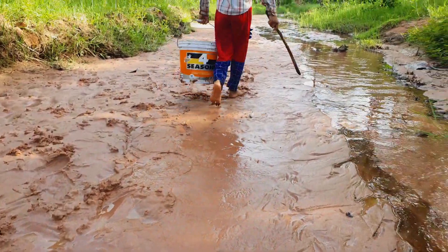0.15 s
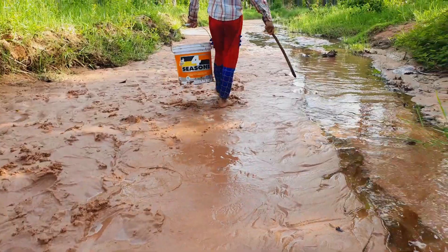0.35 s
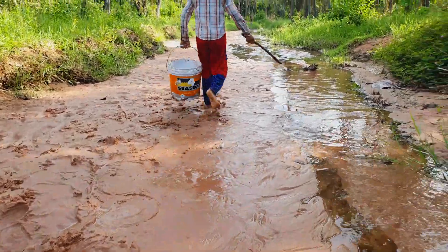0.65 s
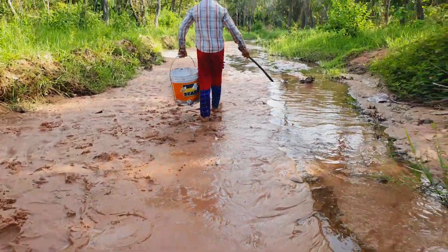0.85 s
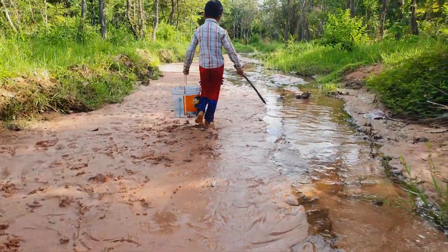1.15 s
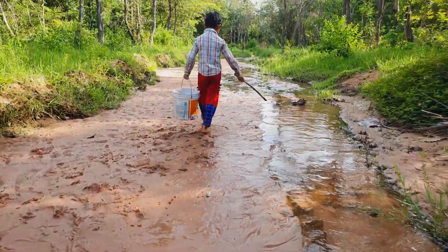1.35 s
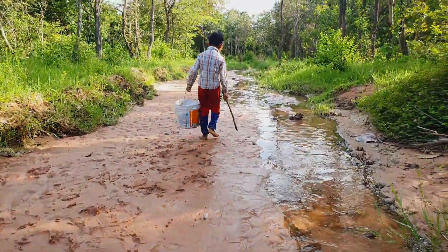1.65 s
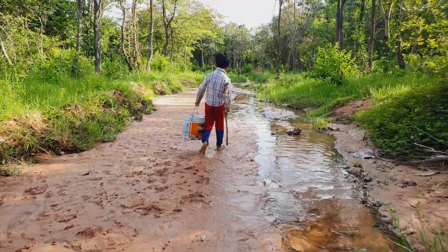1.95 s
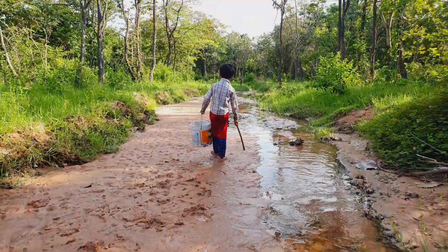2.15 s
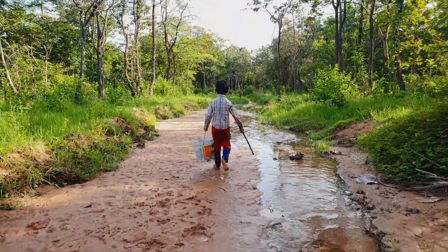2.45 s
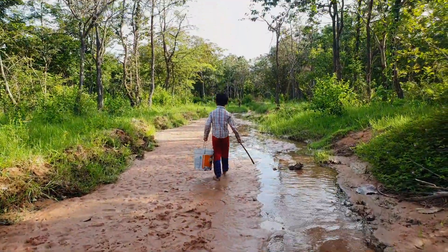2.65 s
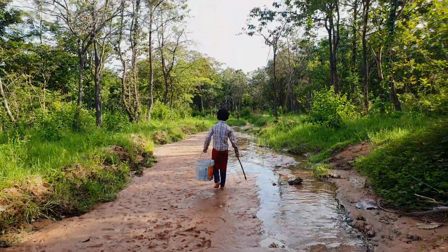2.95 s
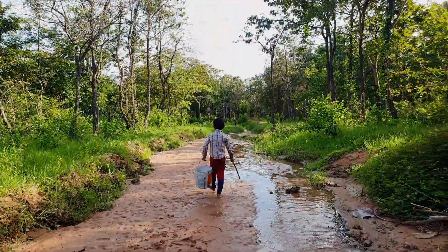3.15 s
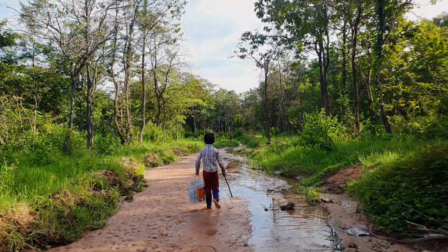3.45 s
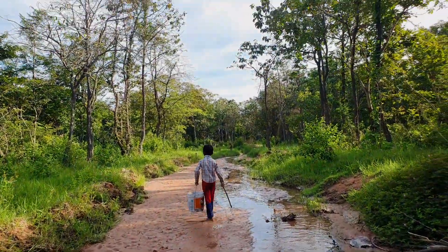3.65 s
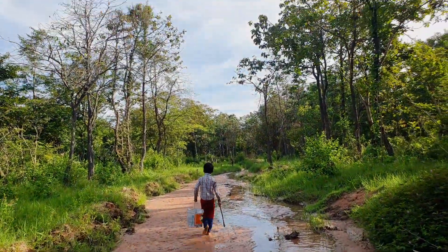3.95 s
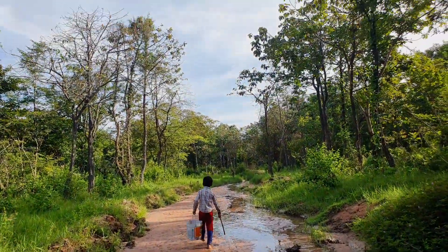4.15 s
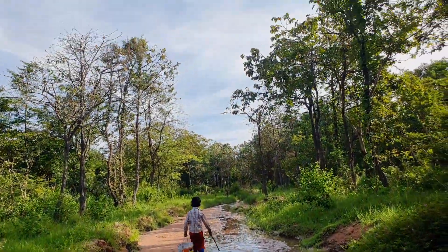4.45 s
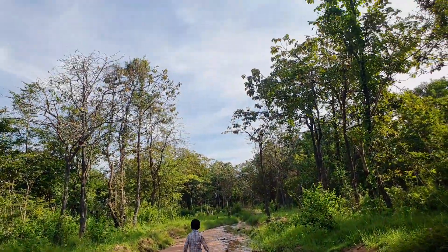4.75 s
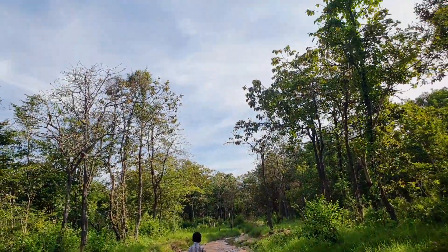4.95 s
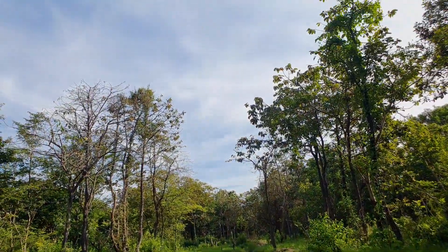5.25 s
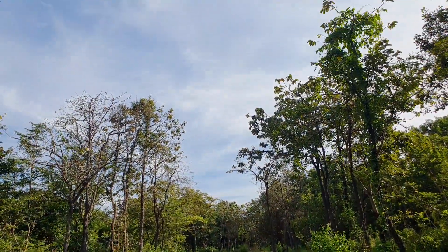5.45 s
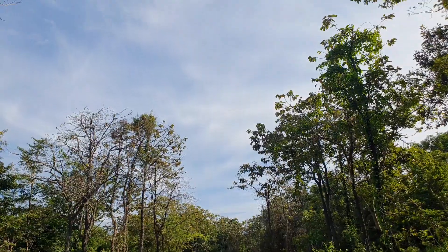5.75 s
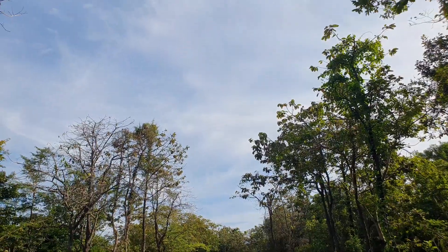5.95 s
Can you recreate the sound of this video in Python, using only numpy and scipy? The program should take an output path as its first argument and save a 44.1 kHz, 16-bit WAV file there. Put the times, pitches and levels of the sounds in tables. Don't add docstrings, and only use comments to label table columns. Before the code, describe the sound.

A high, continuous insect drone and a deep distant rumble fill a leafy outdoor space. Birds call above it: thin upward whistles, falling notes, evenly repeated flicks, then a rapid chatter at the close. Someone walks away over wet sand, the first scuff clearest, later ones faint, with dry ticks and a bucket knock just after four seconds. Soft pulsing katydid buzzes rise and fade midway. Handheld microphone, wide natural stereo.

```python
import sys
import numpy as np
from scipy import signal
from scipy.fft import rfft, irfft, next_fast_len
from scipy.io import wavfile
from scipy.ndimage import uniform_filter1d

SR = 44100
rng = np.random.default_rng(int(sys.argv[2]) if len(sys.argv) > 2 else 0)


def to_wav(sig):
    pcm = np.clip(np.atleast_2d(sig), -1, 1) * 32767
    pcm = np.round(pcm).astype(np.int16)
    wavfile.write(sys.argv[1], SR, pcm.T)


def ratio(d):
    e = np.asarray(d, float) / 20
    return 10 ** e


N = 268467


def colour(x, points):
    hz, db = np.transpose(points)
    size = next_fast_len(N)
    f = np.maximum(np.arange(size // 2 + 1) * SR / size, 1)
    gain = ratio(np.interp(np.log(f), np.log(hz), db))
    return irfft(rfft(x, size) * gain, size)[..., :N]


def unit(x):
    return x / np.sqrt(np.mean(x ** 2))


def curve(table):
    s, *columns = np.transpose(table)
    return [np.interp(np.arange(N) / SR, s, c) for c in columns]


def walk(rate):
    k = int(SR / rate)
    steps = np.repeat(rng.standard_normal(N // k + 1), k)
    return unit(uniform_filter1d(uniform_filter1d(steps, k), k)[:N])


def wavering(hz, wander_hz, rate):
    return np.sin(2 * np.pi * np.cumsum(hz + wander_hz * walk(rate)) / SR)


def band(x, lo_hz, hi_hz, order=2):
    return signal.sosfilt(signal.butter(order, [lo_hz, min(hi_hz, .45 * SR)], "band", fs=SR, output="sos"), x)


def add(out, s, x):
    i = max(int(s * SR), 0)
    out[..., i:i + x.shape[-1]] += x[..., :N - i]


def progress(length):
    return np.arange(int(length * SR)) / (length * SR)


def noise_tail(shape, t60, t):
    tail = rng.standard_normal((*shape, len(t))) * ratio(-60 * t / t60)
    return tail


# (time [s], length [s], from [Hz], to [Hz], level [dB])
RISING_WHISTLES = [
    (0.718, .085, 4190, 5320, -49.5),
    (2.243, 0.058, 3770, 4260, -44.5),
    (2.281, 0.12, 4070, 5410, -40.5),
    (2.866, .12, 3854, 5450, -48.5),
    (4.436, .185, 3620, 5710, -42),
    (5.39, 0.083, 4070, 5270, -50),
    (5.916, .115, 3810, 5060, -49),
]
UPWARD_FLICKS = [
    -54.5,
    -52,
    -55,
    -55,
    -55.5,
    -53.5,
]
FIRST_FLICK_S, FLICK_EVERY_S, FLICK_S = 2.788, .293, 0.036
# (time [s], from [Hz], level [dB])
FALLING_WHISTLES = [
    (.825, 3220, -53),
    (1.745, 3220, -55.5),
    (2.586, 3270, -53.5),
    (3.59, 3310, -51.5),
]
FALL_HZ_PER_S, FALL_END_HZ = 11500, 2300
# (time [s], length [s], from [Hz], to [Hz], level
# [dB])
LEAD_IN_NOTES = [(0.707, 0.03, 4260, 3700, -53), (0.719, 0.034, 3690, 3550, -54),
                 (1.628, 0.15, 3720, 3510, -64), (2.457, 0.023, 4350, 3660, -53),
                 (2.463, 0.044, 3780, 3400, -54.5), (3.491, .045, 3750, 3510, -53),
                 (3.558, 0.046, 3400, 3190, -58.5), (4.426, 0.024, 3980, 3640, -53.5),
                 (4.516, .095, 3450, 2450, -53.5), (5.282, 0.067, 3780, 3330, -61.5),
                 (5.37, 0.07, 3310, 2830, -54.5), (5.903, 0.023, 4200, 3850, -46)]
# (time [s], length [s], from [Hz], to [Hz], level [dB])
QUICK_WARBLE = [ (5.223, 0.072, 2745, 2630, -69), (5.26, .015, 3280, 2800, -62),
                (5.36, 0.054, 2180, 2560, -66), (5.405, 0.02, 2770, 2300, -53),
                (5.422, 0.024, 2540, 2300, -53), (5.448, 0.03, 2690, 2350, -55),
                (5.455, 0.022, 3160, 2750, -54), (5.485, 0.038, 2900, 3200, -55.5),
                (5.514, 0.034, 3210, 2420, -58), (5.698, 0.024, 2490, 2810, -59),
                (5.71, 0.026, 2800, 2530, -62), (5.733, 0.01, 2540, 3150, -58),
                (5.741, 0.02, 3260, 2470, -51), (5.786, 0.012, 3300, 2670, -53),
                (5.791, 0.023, 2400, 2330, -58), (5.798, 0.03, 2680, 3160, -53.5),
                (5.822, 0.011, 3200, 2700, -56), (5.83, 0.028, 3070, 2240, -56),
                (5.859, 0.0154, 3630, 3150, -58), (5.862, .01, 2500, 3000, -60),
                (5.875, 0.019, 3050, 2650, -52.5), (5.892, 0.023, 3540, 2850, -55),
                (5.91, 0.011, 2750, 3150, -54), (5.927, .012, 3100, 3500, -54),
                (5.96, 0.018, 2860, 2900, -63)]


def glides():
    notes = [(*n, 3) for n in RISING_WHISTLES]
    for k, db in enumerate(UPWARD_FLICKS):
        notes.append((FIRST_FLICK_S + k * FLICK_EVERY_S, FLICK_S, 2936, 4420, db, -12))
    for s, hz, db in FALLING_WHISTLES:
        notes.append((s, (hz - FALL_END_HZ) / FALL_HZ_PER_S, hz, FALL_END_HZ, db, 3.5))
    return notes + [(*n, 7) for n in LEAD_IN_NOTES] + [(*n, 9) for n in QUICK_WARBLE]


def whistles():
    sends = np.zeros((2, N))
    for s, length, from_hz, to_hz, db, direct_db in glides():
        u = progress(length)
        bend = u ** (.85 if to_hz < from_hz else .95)
        flutter = 1 + .003 * np.sin(2 * np.pi * 60 * length * u)
        tone = np.sin(2 * np.pi * np.cumsum((from_hz + (to_hz - from_hz) * bend) * flutter) / SR)
        fade_db = 6.5 * u * (to_hz < from_hz - 700)
        note = ratio(db - fade_db) * np.sin(np.pi * u) ** .55 * tone
        add(sends, s, note * ratio(np.array([[direct_db], [-direct_db]]) / 2))
    return sends


# (time [s], length [s], pitch [Hz], quaver [Hz], level [dB])
QUAVERING_NOTES = [(0, 0.022, 3380, 119, -46), (0.102, 0.12, 3420, 257, -56.5),
                   (0.256, 0.16, 3344, 108, -55), (1.535, 0.14, 3470, 100, -58.5),
                   (1.609, 0.086, 3650, 140, -57), (1.811, 0.23, 3370, 128, -55),
                   (2.029, 0.25, 3343, 147, -59), (2.417, 0.075, 5220, 122, -51),
                   (3.148, 0.1, 3545, 203, -54.5), (3.392, 0.052, 6240, 50, -47.5),
                   (3.402, 0.038, 6650, 130, -45.5), (3.518, 0.045, 5440, 198, -42.5),
                   (3.535, 0.063, 5620, 247, -49.5), (3.695, 0.092, 3360, 70, -55),
                   (3.77, 0.092, 3404, 81, -51), (3.864, .05, 2310, 100, -64.5),
                   (3.913, 0.045, 6370, 60, -47.5), (4.6, 0.11, 3580, 202, -55.5),
                   (5.705, 0.25, 3400, 200, -56.5), (5.552, 0.22, 3070, 150, -73),
                   (.553, 0.01, 9400, 30, -57), (.621, .012, 9430, 30, -50), (0.646, 0.0094, 9440, 30, -57),
                   (.664, 0.01, 9440, 30, -49), (.685, 0.0097, 9420, 30, -55)]


def trills():
    sends = np.zeros((2, N))
    quaver = walk(420)
    for s, length, hz, quaver_hz, db in QUAVERING_NOTES:
        u = progress(length)
        pitch = hz + 0.85 * quaver_hz * quaver[int(s * SR):][:len(u)]
        note = ratio(db) * np.sin(np.pi * u) ** .7 * np.sin(2 * np.pi * np.cumsum(pitch) / SR)
        echo_send = 0.9 * (hz < 9000)
        add(sends, s, note * np.array([[1.25], [echo_send]]))
    return sends


def birds():
    direct, far = whistles() + trills()
    t = np.arange(SR) / SR
    echo = noise_tail((2,), 0.53, t) * np.minimum(t / .018, 1)
    echo /= np.sqrt(np.sum(echo ** 2, axis=1, keepdims=True))
    wet = signal.fftconvolve(far[None], echo, axes=1)[:, :N]
    twinkle = ratio(2.6 * np.array([walk(130), walk(130)]))
    return direct * twinkle + ratio(6.5) * wet


# (multiple, left level [dB], right level [dB])
SONG_OVERTONES = [
    (5, -47, -44.5),
    (6, -65, -93),
    (7, -56, -65),
]
# (time [s], main overtone level [dB], upper overtones level [dB])
SONG_SWELL = [(0, -56.5, -64), (.7, -51.5, -58.5), (1.6, -55, -61.5), (3.4, -53.5, -59), (5.3, -58, -63),
              (6.09, -57.5, -67)]
# (time [s], mean pitch [Hz], turns ahead of the steady rock)
SONG_PITCH = [(0, 1413, 0), (.6, 1409, .12), (.9, 1413, .15), (1.3, 1417.5, .2), (2, 1420, .56),
              (2.5, 1422, .9), (3, 1422.5, 1.35), (3.5, 1423.5, 1.8), (4, 1423, 2.1), (4.5, 1423, 2.48),
              (5, 1423.5, 2.4), (5.5, 1423, 2.5), (6.09, 1423, 2.78)]
# (time [s], left level [dB], right level [dB])
HIGH_NOTE_LEAN = [(0, -1.5, 2), (.7, -4.5, -6), (1, 1, -3.5), (1.6, 3.5, 2), (2.2, -3, 0), (3, -1, 2),
                  (4.2, 0, 0), (4.8, 2.5, 4), (5.6, 3, 0), (6.09, 5, 2)]
# (time [s], left level [dB], right level [dB])
SONG_CLARITY = [(0, -2, -1), (.8, 3.5, 1), (1.6, 6, -7.5), (2.2, -11, 0), (3, -3, -3), (3.8, 2, -3),
                (4.5, 5, -6.5), (5.2, 4.5, -3), (5.6, 8.5, -4), (6.09, -1, -2)]
ROCK_HZ, ROCK_SPAN_HZ, ROCK_EDGE = 13, 13, 2.5


def near_cicada():
    t = np.arange(N) / SR
    swell = [ratio(c - c.mean()) for c in curve(SONG_SWELL)]
    hz, ahead = curve(SONG_PITCH)
    rock = np.tanh(ROCK_EDGE * (np.cos(2 * np.pi * (ROCK_HZ * t + ahead)) + .2))
    phase = 2 * np.pi * np.cumsum(hz + ROCK_SPAN_HZ * rock + 1.47 * walk(60)) / SR
    quarter_turn = np.array([[0], [np.pi / 2]])
    song = np.zeros((2, N))
    for k, *db in SONG_OVERTONES:
        song += ratio(np.array(db)[:, None]) * np.sin(k * phase + quarter_turn) * swell[int(k > 5.5)]
    song *= ratio(np.array(curve(HIGH_NOTE_LEAN)) * rock - 6.5 * (1 - rock ** 2))
    tails = noise_tail((2, 2), 0.38, t[:SR // 2])
    tails /= np.sqrt(np.sum(tails ** 2, axis=2, keepdims=True))
    sway = [ratio(3 * np.array([walk(14), walk(14)])) for _ in range(3)]
    wet = sum(signal.fftconvolve(song * s, r, axes=1)[:, :N] for s, r in zip(sway, tails)) / np.sqrt(2)
    echo = ratio(-np.array(curve(SONG_CLARITY)) / 2)
    return (song * sway[2] / echo + wet * echo) * 0.73


# (middle time [s], level [dB])
KATYDID_BUZZES = [(1.755, -65), (1.882, -61), (2.0, -63), (2.115, -67), (2.25, -63), (2.37, -58),
                  (2.485, -56), (2.613, -60), (2.73, -57), (2.847, -59), (2.967, -55), (3.09, -55),
                  (3.22, -55), (3.338, -56.5), (3.457, -55), (3.585, -53), (3.705, -53.5), (3.83, -52),
                  (3.96, -53.5), (4.088, -58), (4.22, -57), (4.33, -58), (4.455, -56), (4.58, -54),
                  (4.712, -58)]
# (time [s], level [dB])
KATYDID_BED = [(1.5, -84), (1.85, -68), (2.5, -59), (3.0, -59.5), (3.8, -56), (4.4, -55.5), (4.75, -58),
               (4.95, -91)]
WING_HZ, TOOTH_HZ, BUZZ_S = 9130, 127, 0.04


def katydid():
    t = np.arange(N) / SR
    buzz = sum(ratio(db - 2.0) * np.exp(-((t - s) / BUZZ_S) ** 4) for s, db in KATYDID_BUZZES)
    teeth = np.exp(-((TOOTH_HZ * t + 0.3 * walk(4)) % 1) / 0.59)
    strikes = (rng.standard_normal((2, N)) + 0.14 * wavering(WING_HZ, 70.1, 30)) * teeth
    ring = band(strikes, WING_HZ - 170, WING_HZ + 230)
    bed = ratio(curve(KATYDID_BED)[0] - 15.5)
    return unit(ring) * (buzz + bed) * ratio(np.array([[1.5], [-1.5]]))


# (time [s], length [s], level [dB], low edge [Hz])
FOOT_SCUFFS = [(0.006, 0.098, -35, 1890), (0.097, 0.097, -47, 2440), (0.191, 0.029, -42.5, 2970),
               (0.424, 0.27, -48.5, 1350), (0.62, 0.1, -42.5, 1790), (0.994, 0.17, -50, 1320),
               (1.45, 0.059, -52, 5000), (1.53, 0.042, -51.5, 3020), (1.942, .1, -51, 3000),
               (2.383, 0.137, -53.5, 600), (2.812, 0.12, -52.5, 1930), (3.309, 0.06, -52, 1500),
               (3.84, 0.082, -52, 1470), (4.797, 0.13, -57.5, 6000)]
# (time [s], length [s],
# level [dB], low edge [Hz], high edge [Hz])
CLOTH_RUBS = [(0.008, 0.095, -41, 2940, 5830), (0.016, 0.14, -50, 450, 2000),
              (0.43, 0.19, -47.5, 2960, 4630), (0.499, 0.098, -63, 620, 796),
              (1.15, 0.17, -55.5, 3130, 5030), (1.172, 0.13, -57, 1450, 1970),
              (4.164, 0.18, -49, 480, 2790), (4.233, 0.2, -51.5, 1400, 8500), (5.454, .16, -68, 300, 1200),
              (.005, 0.15, -41, 12200, 15800), (0.638, 0.13, -55, 12400, 15800),
              (0.52, 0.12, -46.5, 2000, 6200), (1.02, 0.048, -59, 2600, 3770), (4.17, 0.18, -54, 380, 890),
              (4.3, 0.1, -67, 1460, 2030)]


def scuffs():
    out = np.zeros((2, N))
    hiss = rng.standard_normal((2, N + SR))
    sand = uniform_filter1d(rng.standard_normal(N + SR), size=40) * 5.4
    strokes = [(*r, 12400, -0.5) for r in FOOT_SCUFFS] + [(*r, 5) for r in CLOTH_RUBS]
    for s, length, db, lo_hz, hi_hz, grain_db in strokes:
        u = progress(length)
        start = max(int(s * SR), 0)
        now = slice(start, start + len(u))
        noise = band(hiss[:, now] * ratio(grain_db * sand[now]), lo_hz, hi_hz)
        add(out, s, ratio(db) * unit(noise) * np.sin(np.pi * u ** .75) ** 1.5)
    return out


# (time [s], peak level [dB], centre [Hz])
GRIT_TICKS = [(0.252, -38.5, 2780), (0.741, -35, 7940), (1.096, -50.5, 9600), (0.805, -45, 720),
              (1.111, -36, 1500), (1.104, -40.5, 2150), (1.11, -42, 3800), (.511, -43, 4200),
              (1.326, -38, 11000), (1.55, -44, 9500), (2.71, -35, 5030), (2.893, -54, 11500),
              (3.056, -38, 11000), (3.205, -46, 9500), (3.45, -37, 9400), (4.144, -47, 1800),
              (4.233, -51, 2210), (4.262, -34.5, 1680)]


def ticks():
    out = np.zeros((2, N))
    t = np.arange(4000) / SR
    for s, db, hz in GRIT_TICKS:
        snap = unit(band(rng.standard_normal((2, len(t))), hz / 1.06, hz * 1.04, order=1))
        add(out, s, ratio(db) * snap * np.exp(-t / 0.0067) / 2)
    return out


# (time [s], peak level [dB], pitch [Hz], t60 [s])
BUCKET_KNOCKS = [(.005, -47, 326, 0.14), (.802, -42.5, 467, 0.033), (1.109, -46.5, 630, 0.026),
                 (1.134, -48, 420, 0.047), (2.405, -49, 505, 0.027), (4.18, -42.5, 336, 0.04),
                 (4.192, -39, 348, 0.032), (4.206, -32.5, 325, 0.053), (4.271, -47, 630, 0.044),
                 (5.465, -47.5, 342, 0.1), (5.553, -49.5, 310, 0.087)]


def knocks():
    out = np.zeros((2, N))
    t = np.arange(4000) / SR
    for s, db, hz, t60 in BUCKET_KNOCKS:
        rattle = unit(band(rng.standard_normal((2, len(t))), hz, 2.12 * hz))
        modes = np.sin(2 * np.pi * hz * t) + 0.37 * rattle
        add(out, s, ratio(db + 7.5 - 60 * t / t60) * np.minimum(t / 0.0049, 1) * modes)
    return out


# (time [s], peak level [dB])
FAR_PHRASES = [(0, -46), (.19, -60.5), (.64, -47.5), (1.08, -59), (1.5, -61), (2.41, -60), (2.76, -65),
               (3.36, -53.5), (3.8, -57.5), (4.05, -62), (4.58, -50), (5.43, -65), (6.05, -62)]


def far_birdsong():
    t = np.arange(N) / SR
    level = ratio(-74)
    for s, db in FAR_PHRASES:
        slope_db_per_s = np.where(t < s, 87, 79)
        level = level + ratio(db - slope_db_per_s * abs(t - s))
    blur = unit(band(rng.standard_normal((2, N)), 3000, 5020, order=3))
    return blur * level * ratio(np.array([[-5], [2.5]]))


# (low edge [Hz], high edge [Hz], left
# level [dB], right level [dB])
CICADA_BANDS = [
    (4936, 5720, -55.5, -51),
    (5560, 6050, -77, -65.5),
    (6650, 6900, -85, -64.5),
    (7190, 7480, -65, -85),
    (8370, 8680, -68, -87),
    (9600, 11100, -57.5, -86),
    (10630, 11700, -80, -55.5),
    (11970, 13150, -71, -72),
]


def cicadas():
    out = np.zeros((2, N))
    for lo_hz, hi_hz, *db in CICADA_BANDS:
        breath_db = 1.14 * walk(10)
        chorus = unit(band(rng.standard_normal((2, N)), lo_hz, hi_hz, order=3))
        out += chorus * ratio(np.array(db)[:, None] + breath_db)
    return out


# (frequency [Hz], density [dB per Hz])
HISS_LEFT = [(300, -93.5), (500, -94), (1000, -103), (2200, -103), (4200, -108), (5300, -87.5),
             (6400, -101), (7400, -106), (7900, -115), (8600, -99), (11400, -99), (12500, -115),
             (15500, -128)]
# (frequency [Hz], density [dB per Hz])
HISS_RIGHT = [(300, -85), (500, -92), (1000, -100), (2200, -99), (4200, -104), (5300, -82.5), (6400, -103),
              (7400, -104), (8000, -116), (9000, -99), (12000, -99), (13400, -114), (15500, -120)]


def hiss():
    out = np.zeros((2, N))
    for side, shape in enumerate((HISS_LEFT, HISS_RIGHT)):
        noise = colour(rng.standard_normal(N), [(200, -140)] + shape) * np.sqrt(SR / 2)
        low = signal.sosfiltfilt(signal.butter(3, 2800, fs=SR, output="sos"), noise)
        out[side] = low * ratio(walk(13)) + (noise - low) * ratio(walk(14))
    return out


# (time [s], level [dB])
AIR_SWELL = [(0.0, -45.5), (0.27, -50.5), (0.73, -48), (1.17, -50.5), (3.24, -49), (4.34, -54), (4.53, -54),
             (5.09, -56), (5.87, -58.5), (6.09, -56)]


def air():
    swell = curve(AIR_SWELL)[0]
    return (hiss() + cicadas()) * ratio(0.46 * (swell - swell.mean()))


# (time [s], level [dB])
ROAR_LEVEL = [(0, -37), (.5, -38.5), (1.0, -33.5), (1.4, -38.5), (2.3, -41), (3.1, -37.5), (3.4, -40),
              (4.2, -39.5), (4.7, -41), (6.09, -42.5)]
# (frequency [Hz], density [dB per Hz])
ROAR_SHAPE = [(12, -39), (22, -19), (33, -10.5), (48, -5), (66, -1.5), (90, -3.5), (130, -12.5),
              (190, -19.5), (296, -28), (400, -41.5), (520, -79), (880, -120)]
# (time [s], swell [dB])
ROAR_THROBS = [(.1, 4), (.29, 4), (.63, 3.5), (.78, 3), (.86, 7.5), (.95, 4), (1.6, 7), (1.67, 11),
               (2.02, 8), (2.15, 2), (2.45, 7.5), (2.75, 5.5), (2.93, 8), (3.05, 6.5), (3.2, 5.5),
               (3.59, 9), (3.8, 3), (4.41, 8.5), (5.05, 3.5)]
# (time [s], level [dB])
HUM_LEVEL = [(0, -47), (.3, -42.5), (.9, -58), (1.9, -42.5), (2.3, -46.5), (2.9, -37), (3.6, -39.5),
             (3.75, -49), (3.95, -42), (4.2, -46), (4.5, -46.5), (6.09, -70)]
THROB_S, ROAR_HZ, HUM_HZ = 0.046, 63, 159.7


def rumble():
    t = np.arange(N) / SR
    throb_db = sum(db * np.exp(-((t - s) / THROB_S) ** 2) for s, db in ROAR_THROBS)
    shared, *own = rng.standard_normal((3, N))
    noise = unit(colour(shared + 0.78 * np.array(own), ROAR_SHAPE))
    shared_core, *own_core = [wavering(ROAR_HZ, 6, 25) for _ in range(3)]
    core = shared_core + 0.64 * np.array(own_core)
    roar = 0.81 * noise * ratio(0.43 * throb_db) + 0.75 * core * ratio(1.27 * throb_db)
    hum_db = curve(HUM_LEVEL)[0] + 1.5 * walk(12)
    hum = wavering(HUM_HZ, 4.92, 30) * ratio(hum_db - 3.5)
    return roar * ratio(curve(ROAR_LEVEL)[0] + 4.0) + hum


# (frequency [Hz], gain [dB])
LEFT_COLOUR = [(60, -6), (700, -7), (3000, -9), (6200, -6.5), (7500, 2), (9500, 9.5), (11000, -5),
               (13000, -28)]
# (frequency [Hz], gain [dB])
PORT_COLOUR = [(6500, 0.5), (7900, -10.5), (9000, -5), (12000, 8), (13500, -5.5), (15500, -9)]


def ports(x):
    left, right = x
    return np.array([colour(colour(left, LEFT_COLOUR), PORT_COLOUR), colour(right, PORT_COLOUR)])


# (low edge [Hz], high edge [Hz], left share open, right share open)
FAINT_BANDS = [(7520, 8270, .33, .25), (8270, 8900, 1, .88), (11900, 13250, .28, 1), (13250, 14500, .2, .4),
               (14500, 15700, .1, .3)]


def thin_faint_bands(x):
    hop = 1024
    size = (N // hop + 1) * hop
    spectrum, f = rfft(x, size), np.arange(size // 2 + 1) * SR / size
    out = x.copy()
    for lo_hz, hi_hz, *share in FAINT_BANDS:
        part = irfft(spectrum * ((f > lo_hz) & (f < hi_hz)), size)
        power = np.mean(part.reshape(2, -1, hop) ** 2, axis=2)
        power *= ratio(3.5 * rng.standard_normal(power.shape))
        shut = np.array([p < np.quantile(p, 1 - s) for p, s in zip(power, share)])
        mute = uniform_filter1d(np.repeat(1. * shut, hop, axis=1), size=hop // 2, axis=1)
        out -= (part * mute)[:, :N]
    return out


def scene():
    walker = scuffs() + ticks() + knocks()
    near = ports(birds() + walker + rumble())
    return near + near_cicada() + katydid() + far_birdsong() + air()


def top_cut(x):
    return signal.sosfilt(signal.butter(12, 15690, fs=SR, output="sos"), x)


def record(dry):
    mix = thin_faint_bands(dry)
    return top_cut(mix)


dry = scene()
out = record(dry)
to_wav(out)
```